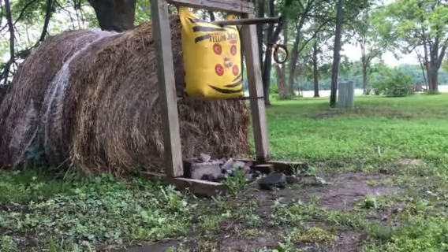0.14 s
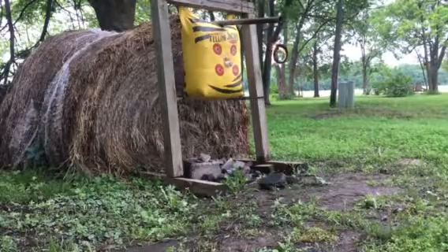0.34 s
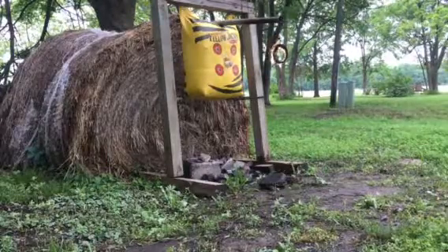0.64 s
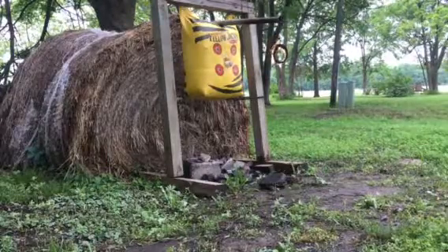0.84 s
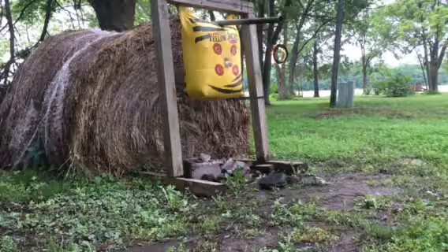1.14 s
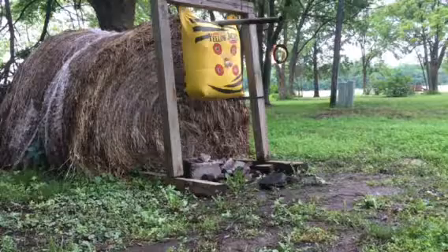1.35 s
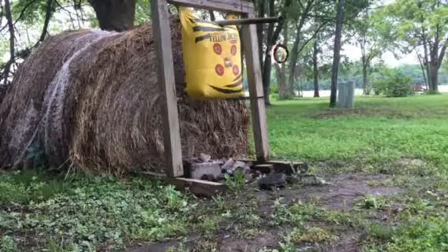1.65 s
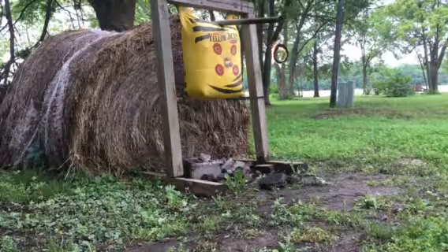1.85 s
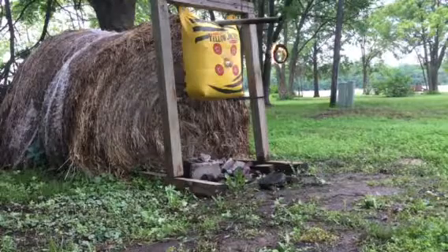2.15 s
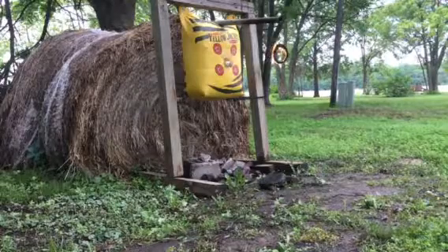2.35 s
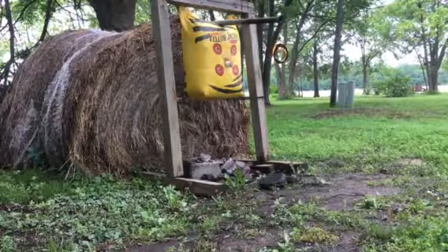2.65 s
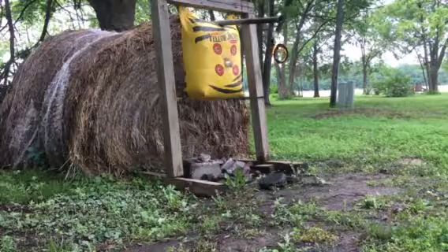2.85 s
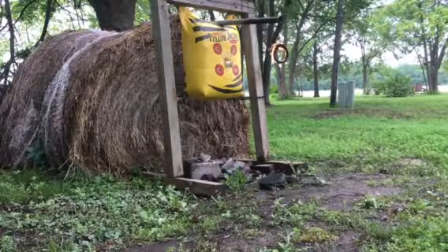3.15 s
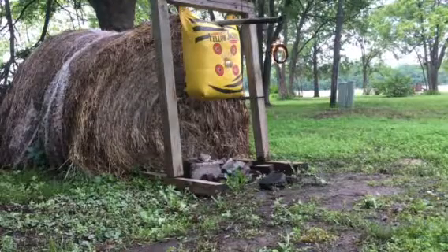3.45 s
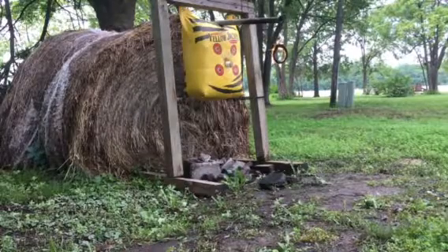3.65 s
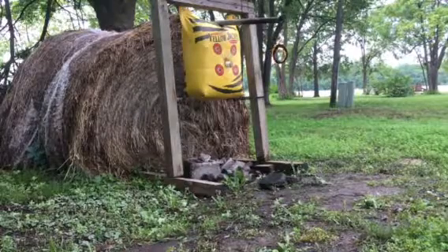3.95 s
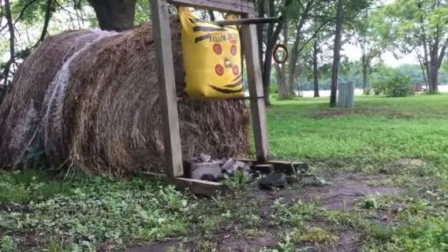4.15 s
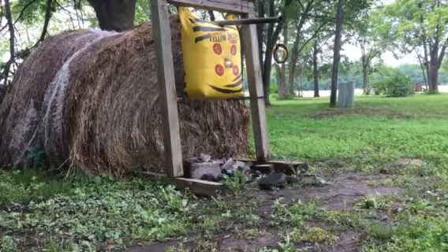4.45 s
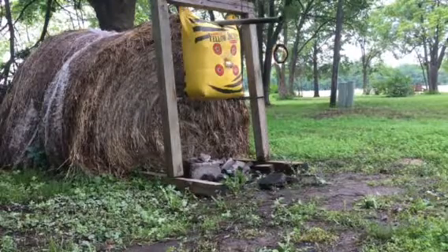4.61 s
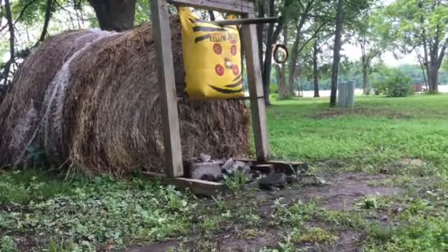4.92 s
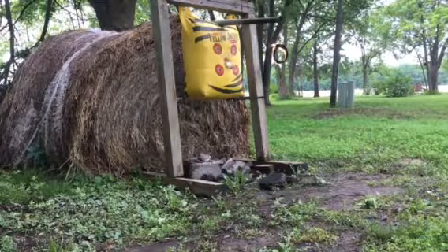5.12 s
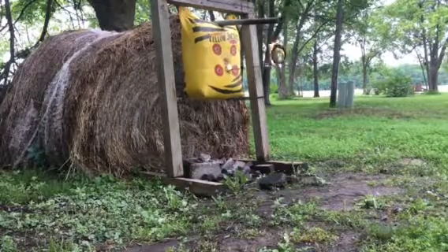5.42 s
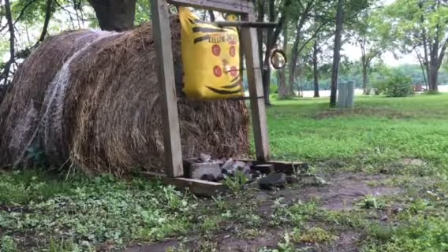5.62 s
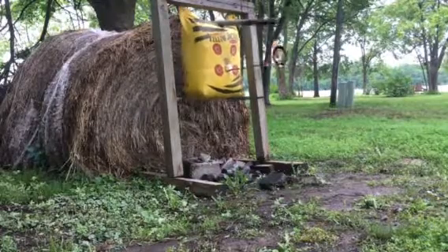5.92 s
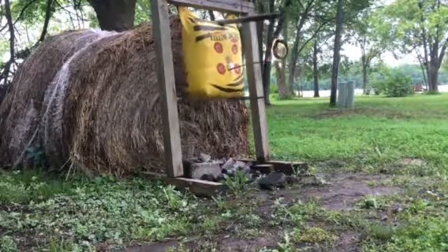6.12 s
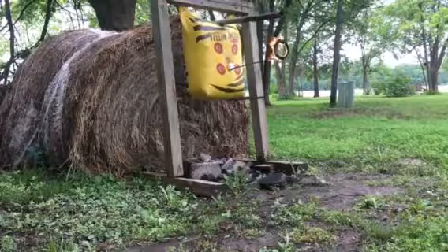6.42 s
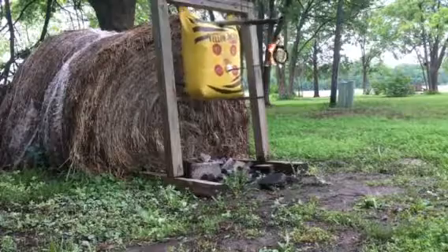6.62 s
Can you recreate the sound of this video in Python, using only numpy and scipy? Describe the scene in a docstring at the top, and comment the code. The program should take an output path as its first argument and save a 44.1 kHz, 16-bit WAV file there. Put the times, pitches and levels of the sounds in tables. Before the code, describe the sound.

On a lawn among trees, wind rumbles and bumps unevenly against the microphone. Leaves rustle softly, and birds whistle and trill faintly some way off. Late on, a bow fires once: the string snaps, the arrow hisses briefly and at once hits a stuffed bag target with a sharp, loud smack. A faint echo follows, and the wind carries on.

```python
"""A lawn among trees, with a stuffed bag target hanging before a hay bale and the microphone in the breeze.
Wind rumbles and slaps on the microphone, leaves rustle, and birds whistle and trill some way off.
Late on, one arrow is shot: the string snaps forward, the limbs thump, the vanes hiss past, and the point
cracks through the bag's woven cover into the filling, leaving the shaft ringing.
Bale, frame and ground answer at once; the tree line throws back a faint echo."""
import sys
import numpy as np
from scipy import signal
from scipy.fft import rfft, irfft, next_fast_len
from scipy.io import wavfile
from scipy.ndimage import uniform_filter1d, map_coordinates

SR = 44100
rng = np.random.default_rng(int(sys.argv[2]) if len(sys.argv) > 2 else 0)


def store_pcm(level_fs):
    """Save levels as 16-bit WAV."""
    pcm = np.round(np.clip(level_fs, -1, 1) * 32767).astype(np.int16)
    wavfile.write(sys.argv[1], SR, np.atleast_2d(pcm).T)


N = 298645
T = np.arange(N) / SR

# strength of the breeze at the microphone: t/s, level/dB
BREEZE_LEVEL = [(0, -57.5), (0.3, -49), (0.65, -52), (0.8, -44.5), (1.5, -48), (1.92, -37.5), (2.25, -49),
                (2.68, -45.5), (2.88, -44.5), (3.55, -52.5), (3.88, -52), (4.5, -44), (5.3, -46.5),
                (5.7, -48.5), (6.3, -44), (6.62, -51), (6.77, -58.5)]
# spectrum of the wind's rumble on the microphone: f/Hz, level/dB
RUMBLE_SPECTRUM = [(20, -12), (30, -12), (42, 1), (65, 3), (100, -0.5), (160, -11.5), (240, -22),
                   (400, -53.5), (800, -69.5)]
# spectrum of the eddies' flutter and slaps: f/Hz, level/dB
EDDY_SPECTRUM = [(60, -6.5), (150, 5.5), (280, -4.5), (420, -14), (600, -23.5), (1000, -45.5), (2000, -76),
                 (6000, -100)]
# single eddies hitting the microphone: t/s, rumble swell/dB, relative slap level/dB
EDDY_HITS = [(0.289, -43, -51), (0.408, -35, -36), (0.51, -39.5, -29), (0.9, -38, -47), (1.06, -43.5, -52),
             (1.39, -39, -52.5), (1.619, -39, -50), (1.75, -33.5, -39), (1.819, -40, -37),
             (1.891, -34, -30.5), (1.953, -37.5, -25.5), (1.965, -31.5, -43), (2.002, -35.5, -29),
             (2.051, -38, -38.5), (2.107, -39.5, -35), (2.731, -42.5, -40), (2.82, -40, -44.5),
             (2.89, -35.5, -41), (3.075, -34, -35.5), (3.139, -43, -33.5), (3.2, -38.5, -40),
             (3.446, -42, -47), (3.586, -38.5, -36), (3.70, -35, -39.5), (3.953, -33, -28),
             (4.187, -37, -31), (4.198, -41, -30), (4.309, -41, -53), (4.405, -36.5, -48),
             (4.467, -35, -37.5), (4.52, -38.5, -49.5), (4.66, -43, -53), (4.73, -39.5, -48),
             (4.778, -42, -39.5), (4.93, -36.5, -49), (5.07, -37, -32.5), (5.169, -38, -53),
             (5.24, -38.5, -43), (5.385, -36, -44.5), (5.66, -42.5, -52), (5.888, -41, -43),
             (6.104, -36.5, -24.5), (6.122, -31.5, -28.5), (6.139, -43.5, -31.5), (6.219, -39.5, -58),
             (6.415, -32, -30), (6.427, -44, -25)]
# spectrum of wind in the distant trees: f/Hz, level/dB
FAR_HISS_SPECTRUM = [(180, -10.5), (300, 1.5), (343, -4), (412, 0.5), (462, -4.5), (574, 1), (930, -4),
                     (1840, -7.5), (2880, -4.5), (4230, -9), (4910, -11.5), (7080, -8), (10600, -18.5),
                     (15000, -21), (16000, -27)]
# that hiss slowly easing: t/s, relative level/dB
FAR_HISS_LEVEL = [(0, -66), (3, -67.5), (6.77, -68.5)]
# nearer leaves stirred by a gust: t/s, level/dB
RUSTLE_LEVEL = [(0, -69.5), (1.65, -66.5), (1.83, -57.5), (1.98, -61), (2.15, -64), (2.6, -63), (3.1, -68),
                (4.2, -70), (6.77, -82)]
# spectrum of those leaves: f/Hz, level/dB
LEAF_SPECTRUM = [(1500, 1.5), (3000, -8), (6500, 3.5), (10000, -2), (13000, -2), (16000, -4)]
# spectrum of a tick close to the microphone: f/Hz, level/dB
TICK_SPECTRUM = [(1000, -27), (4000, -10), (6500, 0), (9000, 2), (12000, -6), (16000, -18)]
# the nearer birds' whistled notes: t/s, length/s, start f/Hz, end f/Hz, level/dB, warble/Hz
WHISTLE_NOTES = [(0.213, 0.105, 3360, 3254, -59, 70), (0.62, 0.076, 3120, 2950, -61, 23),
                 (0.69, 0.1, 2700, 2045, -58, 170), (0.816, 0.14, 2406, 2350, -61.5, 61),
                 (.92, 0.089, 3050, 2740, -62, 60), (1.209, 0.076, 2780, 2520, -61, 50),
                 (1.284, 0.094, 2960, 3150, -59.5, 140), (1.374, 0.13, 2200, 2760, -55, 66),
                 (1.49, .06, 3540, 3620, -60.5, 20), (1.539, 0.05, 3150, 2570, -52.5, 31),
                 (1.877, 0.076, 2790, 2430, -58.5, 270), (1.972, 0.062, 2327, 2650, -53.5, 210),
                 (2.04, .05, 2200, 1875, -62.5, 30), (2.41, 0.057, 4620, 4680, -64, 25),
                 (3.51, .05, 2700, 2950, -63, 56), (3.97, 0.025, 3120, 2080, -53.5, 100),
                 (4.018, 0.061, 2980, 2625, -55, 10), (4.066, 0.059, 3110, 3050, -57, 10),
                 (4.109, 0.049, 2290, 2020, -58.5, 120), (4.218, .05, 4270, 4130, -60.5, 22),
                 (4.334, .073, 4100, 3540, -62.5, 80), (4.498, 0.098, 2800, 3100, -59, 24),
                 (4.56, 0.072, 2800, 2610, -58, 26), (4.741, 0.09, 2140, 2150, -62.5, 45),
                 (4.901, 0.05, 2300, 2535, -60, 42), (5.098, 0.044, 3270, 2920, -60, 60),
                 (5.146, .07, 2316, 2520, -54, 27), (5.258, 0.096, 2380, 2324, -56, 110),
                 (6.452, 0.046, 1160, 1255, -60.5, 110)]
# thin, high bird calls: t/s, length/s, start f/Hz, level/dB
THIN_NOTES = [(.6, 0.21, 7500, -65), (1.267, 0.26, 7450, -61), (2.26, 0.25, 7200, -62.5),
              (2.507, .14, 6850, -58.5), (3.151, .47, 6850, -60.5), (3.85, .17, 7150, -64),
              (4.213, .27, 7100, -61), (4.766, 0.26, 7330, -58.5), (5.26, .096, 7000, -52)]
# buzzy trills, some overlapping:
# t/s, length/s, syllable rate/Hz, top f/Hz, slide depth/fraction, relative level/dB, overtone/dB
TRILL_PHRASES = [(2.632, 0.39, 32, 7750, 0.2, -52.5, -17), (3.729, 0.28, 26, 3700, 0.24, -60, -28),
                 (4.444, .36, 28.5, 7430, 0.14, -50, -19), (4.526, 0.3, 14.4, 7330, 0.24, -55.5, -9),
                 (4.933, 0.29, 28, 7590, .21, -49.5, -14.5), (5.07, 0.2, 28.5, 7520, 0.32, -55, -8)]
# the arrow sliding off the bow and hissing past: t/s, level/dB
FLIGHT_LEVEL = [(5.395, -72), (5.408, -43), (5.413, -43), (5.422, -31.5), (5.44, -43), (5.455, -37),
                (5.48, -41), (5.49, -68)]
# spectrum of air over the vanes: f/Hz, level/dB
VANE_SPECTRUM = [(200, 12), (700, -2.5), (1400, -1.5), (2500, 0), (4800, -6), (6400, 1), (10000, -7.5),
                 (16000, -12)]
# spectrum of the string's snap: f/Hz, level/dB
SNAP_SPECTRUM = [(300, -5), (700, 4), (1300, -10), (2100, -15), (3500, -1), (4900, -7), (6400, 0.5),
                 (8000, -9), (13000, -6), (16000, -16)]
# modes of the limbs and string: f/Hz, level/dB, t60/s
LIMB_STRING_MODES = [(72, -19.5, 0.097), (161, -33, 0.086), (256, -33, 0.063), (566, -48, .06),
                     (714, -37, 0.067), (1120, -35, 0.13), (1580, -34.5, 0.063)]
# the point pierces the cover, then the shaft slides in and is stopped:
# t/s, crack level/dB, crack length/s, tilt/(dB per octave), push on the filling/dB
ARROW_IMPACTS = [(5.4819, -11.5, 0.0022, 0, -25), (5.4893, -11, 0.0013, -0.2, -20),
                 (5.4921, -19.5, 0.0025, 3.5, 2), (5.4981, -26.5, 0.0077, 2.5, -34)]
# spectrum of the woven cover's crack: f/Hz, level/dB
COVER_SPECTRUM = [(200, -9), (480, -7.5), (640, -21), (850, 3), (1050, -1.5), (1300, 4.5), (1800, -3),
                  (2450, 0.5), (3500, -2.5), (4900, -8.5), (6300, -4.5), (8500, -6), (10500, -11),
                  (15500, -12)]
# modes of the filling's thud: f/Hz, relative level/dB, t60/s
FILLING_MODES = [(85, -22, 0.11), (147, -24.5, 0.072), (265, -15, 0.027), (340, -24, 0.032),
                 (451, -30.5, 0.089)]
# modes of the shaft held in the bag: f/Hz, level/dB, t60/s
HELD_SHAFT_MODES = [(890, -42, 0.047), (1187, -29, 0.055), (1306, -33, 0.048), (1615, -29.5, 0.084),
                    (2050, -46, 0.048), (2240, -44, 0.081), (2410, -26, 0.06), (2600, -49, .09),
                    (2970, -47, .09), (3250, -36, 0.16)]
# spectrum of the reflections around the lawn: f/Hz, level/dB
REFLECTION_SPECTRUM = [(100, -14.5), (500, -5), (1200, -11), (2200, -2.5), (4000, -3.5), (7000, -3),
                       (16000, 2)]


def from_db(db):
    """Decibels to gain."""
    return 10 ** (np.asarray(db) / 20)


def rms_one(x):
    """Scale to unit power."""
    return x / np.sqrt(np.mean(x ** 2) + 1e-20)


def level(rows):
    """Gain over time from rows of t/s, level/dB."""
    return from_db(np.interp(T, *np.transpose(rows)))


def colour(x, spectrum, tilt_db=0, size=8192):
    """Minimum-phase filter of unit power gain through rows of f/Hz, level/dB, tilted per octave."""
    hz, db = np.transpose(spectrum)
    octave = np.log2(np.maximum(np.fft.rfftfreq(size, 1 / SR), 1))
    shape = from_db(np.interp(octave, np.log2(hz), db) + tilt_db * np.maximum(octave, np.log2(hz[0])))
    cepstrum = irfft(np.log(rms_one(shape)))[:size // 2]
    cepstrum[1:] *= 2
    response = irfft(np.exp(rfft(cepstrum, size)))[:size // 2]
    return signal.oaconvolve(x, response)[:len(x)]


def noise(spectrum):
    """Coloured noise of unit power."""
    return rms_one(colour(rng.standard_normal(N), spectrum))


def even(x, window_s):
    """Level out swells longer than the window."""
    power = np.abs(signal.hilbert(x, next_fast_len(N))[:N]) ** 2 / 2
    mean_power = uniform_filter1d(power, int(window_s * SR))
    return x / np.sqrt(np.abs(mean_power) + 1e-9)


def wobble(per_s, size):
    """Smooth random wander of about unit spread."""
    return map_coordinates(rng.standard_normal(4096), [T[:size] * per_s], order=3, mode="wrap")


def burst(envelope, passes=4):
    """Noise under a short envelope, with all frequencies about equally strong."""
    x = rng.standard_normal(len(envelope)) * envelope
    for _ in range(passes):
        flat = irfft(np.exp(1j * np.angle(rfft(x))), len(x)) * np.linalg.norm(envelope)
        x = np.clip(flat, -2 * envelope, 2 * envelope)
    return x


def crack(length_s, tail_db, tail_t60_s, size=4096):
    """A short tearing burst, then a weaker crackle."""
    t = T[:size]
    tail = from_db(tail_db - 60 * (t - length_s) / tail_t60_s)
    return burst(np.where(t < length_s, 1, tail))


def ring(modes, attack_s, size=16384):
    """Damped sines set going by a push that takes attack_s."""
    t = T[:size]
    ringing = sum(from_db(db - 60 * t / t60) * np.sin(2 * np.pi * hz * t) for hz, db, t60 in modes)
    return ringing * (1 - np.exp(-t / attack_s))


def wind(lump_db=2.5, swell_s=0.02, lag_s=0.0036, flutter_db=-15, growth=1.44, reference_db=-38):
    """Turbulence on the microphone: rumble follows breeze and eddies; the flutter grows faster."""
    breeze = level(BREEZE_LEVEL) * from_db(lump_db * wobble(per_s=18, size=N))
    # each eddy drags a swell of rumble just behind its slap
    swell_power = sum(from_db(db) ** 2 * np.exp(-((T - s - lag_s) / swell_s) ** 2)
                      for s, db, _ in EDDY_HITS)
    gust = np.sqrt(breeze ** 2 + swell_power)
    rumble = gust * even(noise(RUMBLE_SPECTRUM), window_s=0.062)
    flutter_gain = from_db(reference_db + flutter_db) * (gust / from_db(reference_db)) ** growth
    return rumble + flutter_gain * noise(EDDY_SPECTRUM)


def trees(hiss_gain_db=8):
    """Wind hisses softly in the far trees, and a gust stirs the nearer leaves once."""
    far_hiss = from_db(hiss_gain_db) * level(FAR_HISS_LEVEL) * noise(FAR_HISS_SPECTRUM)
    return far_hiss + level(RUSTLE_LEVEL) * noise(LEAF_SPECTRUM)


def add(out, s, x):
    """Mix x into out from time s on."""
    start = max(round(s * SR), 0)
    out[start:start + len(x)] += x[:max(len(out) - start, 0)]


def bird_note(length_s, start_hz, end_hz, warble_hz, settle=1.7, fade=0.19):
    """A whistle that glides quickly at first, then settles on its last pitch, with an uneven warble."""
    progress = np.linspace(0, 1, int(length_s * SR))
    size = len(progress)
    hz = end_hz + (start_hz - end_hz) * (1 - progress) ** settle + warble_hz * wobble(261.4, size)
    envelope = signal.windows.tukey(size, 2 * fade) * from_db(2.2 * wobble(76.7, size))
    return envelope * np.sin(2 * np.pi * np.cumsum(hz) / SR)


def far_flock(low_hz, high_hz, db, glide, count):
    """Faint birds far from the microphone, calling at random within one range of pitch."""
    out = np.zeros(N)
    for slot, (when, pitch, length, slope) in enumerate(rng.random((count, 4))):
        centre_hz = low_hz + pitch * (high_hz - low_hz)
        glide_hz = centre_hz * glide * (2 * slope - 1)
        length_s = 0.0507 + 0.0824 * length
        call = bird_note(length_s, centre_hz - glide_hz, centre_hz + glide_hz, warble_hz=78.4)
        add(out, (slot + when) / count * T[-1], from_db(db) * call)
    return out


def canopy(x, t60_s=0.63, size=30000):
    """Trunks and branches smear the song on its way to the microphone."""
    response = rng.standard_normal(size) * from_db(-60 * T[:size] / t60_s)
    return signal.oaconvolve(x, response / np.linalg.norm(response))[:N]


def tick(at_s=0.0513, db=-36):
    """One tiny tick close to the microphone."""
    out = np.zeros(N)
    click = crack(length_s=0.00055, tail_db=-8, tail_t60_s=0.017)
    add(out, at_s, from_db(db) * colour(click, TICK_SPECTRUM))
    return out


def whistles():
    """The nearer birds whistle phrases of short gliding notes."""
    out = np.zeros(N)
    for s, length_s, start_hz, end_hz, db, warble_hz in WHISTLE_NOTES:
        add(out, s, from_db(db) * bird_note(length_s, start_hz, end_hz, warble_hz))
    return out


def buffets(gain_db=-0.3, slap_s=0.0121, halving_db=7, untilted_s=0.0086, size=12000):
    """Eddies slap the microphone; the harder a slap against its swell, the shorter and brighter it is."""
    out = np.zeros(N)
    t = T[:size] - T[size // 2]
    for s, swell_db, slap_db in EDDY_HITS:
        length_s = slap_s * 2 ** ((swell_db - slap_db) / halving_db)
        push = burst(1 / (1 + (t / length_s) ** 2) ** 2)
        tilt_db = 3 * np.log2(untilted_s / length_s)
        add(out, s + t[0], from_db(slap_db + gain_db) * colour(push, EDDY_SPECTRUM, tilt_db))
    return out


def thin_calls(end_hz=7410, warble_hz=168.6):
    """Long, high bird notes that all slide onto the same pitch."""
    out = np.zeros(N)
    for s, length_s, start_hz, db in THIN_NOTES:
        call = bird_note(length_s, start_hz, end_hz, warble_hz, settle=1.4, fade=0.25)
        add(out, s, from_db(db) * call)
    return out


def trills(gain_db=0.84, rise=0.199, swell_db=8, ragged=0.026, rasp_db=3):
    """Each syllable flicks up and slides down raggedly; the bird's trill swells and grows a harsh octave."""
    out = np.zeros(N)
    for s, length_s, rate_hz, top_hz, depth, db, overtone_db in TRILL_PHRASES:
        progress = np.linspace(0, 1, int(length_s * SR))
        size = len(progress)
        in_syllable = (rate_hz * length_s * progress + rise / 2 + 0.23 * wobble(25, size)) % 1
        arch = np.interp(in_syllable, [0, rise, 1], [0, 1, 0])
        hz = top_hz * (1 - depth * (1 - arch) + ragged * wobble(500, size))
        phase = 2 * np.pi * np.cumsum(hz) / SR
        contour_db = swell_db * np.minimum(progress - 0.5, 0.15) + rasp_db * wobble(204.2, size)
        envelope = from_db(db + gain_db + contour_db) * signal.windows.tukey(size, 0.15)
        fundamental = arch ** 0.27 * np.sin(phase)
        octave = from_db(overtone_db) * progress ** 0.24 * (1 - 0.47 * arch) * np.sin(2 * phase)
        add(out, s, envelope * (fundamental + octave))
    return out


def bow(release_s=5.4101, snap_db=-23):
    """The string snaps forward, the limbs thump, and the vanes hiss past the microphone."""
    in_flight = (T > FLIGHT_LEVEL[0][0]) & (T < FLIGHT_LEVEL[-1][0])
    out = level(FLIGHT_LEVEL) * noise(VANE_SPECTRUM) * in_flight
    snap = crack(length_s=0.001, tail_db=-12, tail_t60_s=0.022)
    add(out, release_s, from_db(snap_db) * colour(snap, SNAP_SPECTRUM))
    add(out, release_s, -ring(LIMB_STRING_MODES, attack_s=0.0017))
    return out


def sink_in(x, lag_s=0.00071, corner_hz=2640):
    """Lows come later than highs: the crack deepens as the point goes in."""
    hz = np.fft.rfftfreq(len(x), 1 / SR)
    phase_lag = 2 * np.pi * lag_s * corner_hz * np.arctan(hz / corner_hz)
    return irfft(rfft(x) * np.exp(-1j * phase_lag), len(x))


def bag_target():
    """Each impact cracks the woven cover and shoves the filling; the shaft rings once it is held."""
    out = np.zeros(N)
    for s, crack_db, length_s, tilt_db, push_db in ARROW_IMPACTS:
        tear = sink_in(crack(length_s, tail_db=-8.5, tail_t60_s=0.0268))
        add(out, s, from_db(crack_db) * colour(tear, COVER_SPECTRUM, tilt_db))
        add(out, s, -from_db(push_db) * ring(FILLING_MODES, attack_s=0.00062))
    held_s = ARROW_IMPACTS[1][0]
    add(out, held_s, ring(HELD_SHAFT_MODES, attack_s=0.0008))
    return out


def lawn_echo(x, near_s=0.0014, near_t60_s=0.36, far_s=0.23, far_t60_s=0.88,
              far_db=-19.5, far_rise_s=0.093, far_cut_hz=4500, size=44100):
    """Bale, frame and ground scatter at once; the far tree line answers later, longer and duller."""
    t = T[:size]
    near, far = (colour(white, REFLECTION_SPECTRUM) for white in rng.standard_normal((2, size)))
    scatter = near * from_db(-60 * t / near_t60_s) * (t > near_s)
    far_rise = np.exp(np.minimum(t - far_s, 0) / far_rise_s)
    far_decay = from_db(far_db - 60 * np.maximum(t - far_s, 0) / far_t60_s)
    dulled = signal.sosfilt(signal.butter(1, far_cut_hz, fs=SR, output="sos"), far)
    response = scatter + far_rise * far_decay * dulled
    return signal.oaconvolve(x, response / np.linalg.norm(response))[:N]


def scene(shot_wet_db=-7, song_wet_db=-2, trill_wet_db=-3):
    """One microphone on the lawn: the shot and its echo, birds some way off, wind and trees."""
    shot = bow() + bag_target()
    tick_and_shot = tick() + shot
    song = whistles() + thin_calls()
    buzz = trills()
    far_birds = far_flock(low_hz=2100, high_hz=4200, db=-68.5, glide=0.0923, count=110)
    far_birds += far_flock(low_hz=6950, high_hz=7400, db=-73, glide=0.029, count=70)
    # the far birds reach the microphone only through the canopy
    smeared = canopy(from_db(song_wet_db) * song + from_db(trill_wet_db) * buzz + far_birds)
    birds = song + buzz + smeared
    echo = from_db(shot_wet_db) * lawn_echo(tick_and_shot)
    return (tick_and_shot + echo + birds + wind() + buffets() + trees())[None]


def record(dry, low_cut_hz=37, high_cut_hz=15950):
    """The microphone drops the deepest bass; the top is cut steeply."""
    low_cut = signal.butter(4, low_cut_hz, "high", fs=SR, output="sos")
    high_cut = signal.ellip(12, 0.1, 80, high_cut_hz, fs=SR, output="sos")
    return signal.sosfilt(high_cut, signal.sosfilt(low_cut, dry))


dry = scene()
out = record(dry)
store_pcm(out)
```